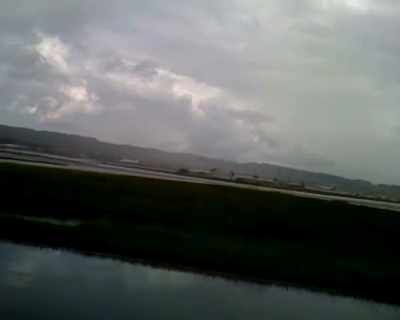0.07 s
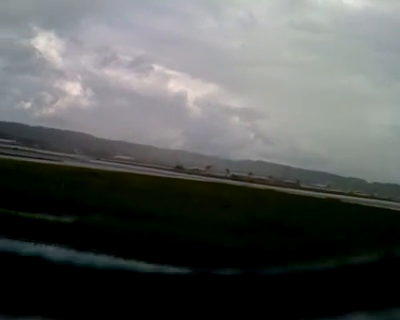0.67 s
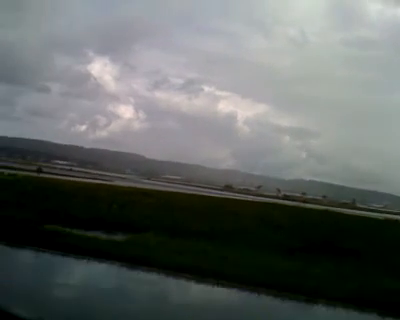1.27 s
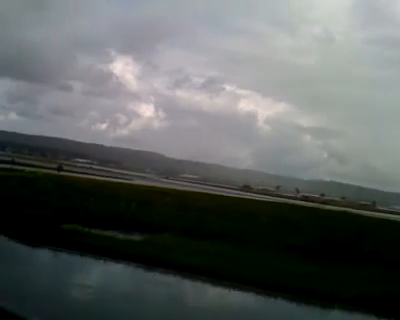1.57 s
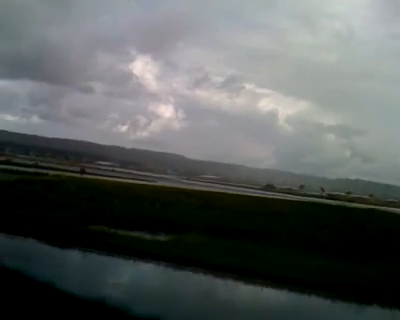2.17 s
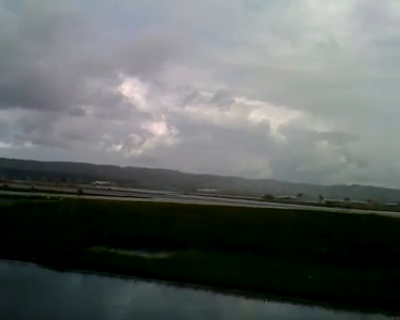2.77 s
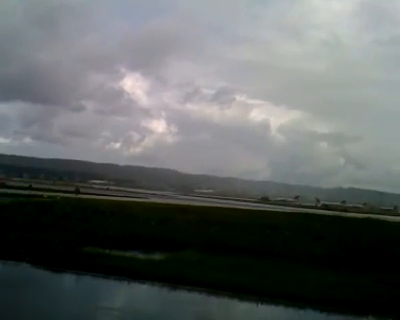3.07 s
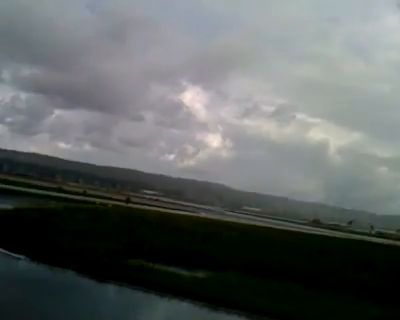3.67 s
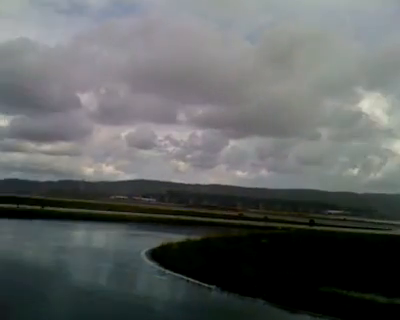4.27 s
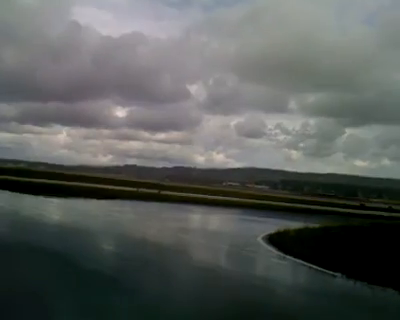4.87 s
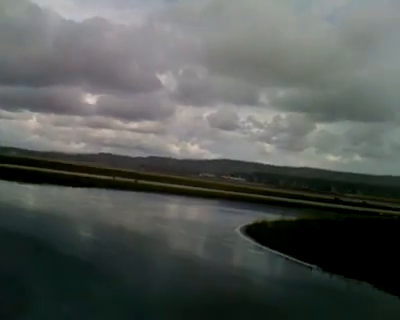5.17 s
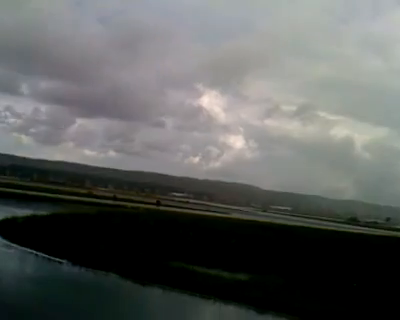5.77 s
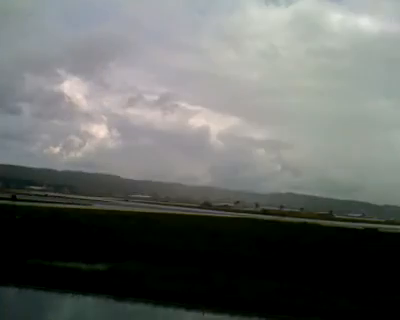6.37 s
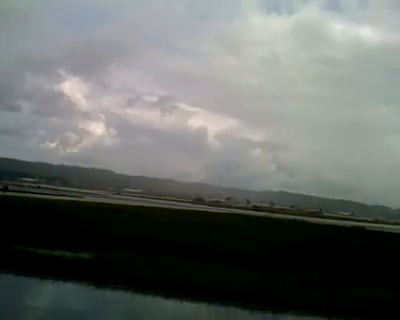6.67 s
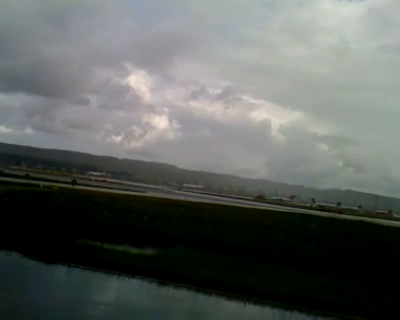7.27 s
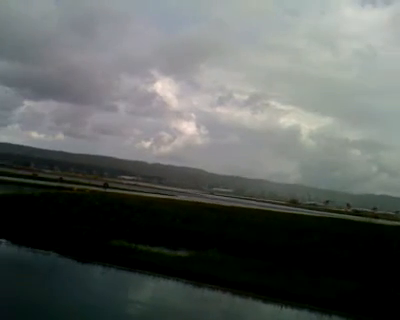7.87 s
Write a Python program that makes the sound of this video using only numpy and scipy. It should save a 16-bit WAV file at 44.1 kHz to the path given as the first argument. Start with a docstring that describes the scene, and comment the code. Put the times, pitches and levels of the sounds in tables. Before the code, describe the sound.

Jet engines run far off at an airfield, giving a steady low rumble and a hollow roar. A faint whine wavers and creeps upward in pitch, and a little past halfway a soft howl holds for about a second. Wind buffets the microphone now and then with low thumps. Close by, light irregular ticks like sparse raindrops continue throughout, over a fine crackle and soft hiss.

```python
"""An airfield, with jet engines running far off. Turbulent exhaust gives a steady rumble and a roar, made
hollow where the ground reflection cancels one band; faint blade tones creep up as a shaft gains speed.
Wind eddies buffet the microphone now and then. Close by, small impacts (perhaps sparse raindrops) give
light ticks, among a fine crackle and a few scuffs, over a soft hiss."""
import sys
import numpy as np
from scipy import signal
from scipy.fft import rfft, irfft
from scipy.io import wavfile
from scipy.ndimage import uniform_filter1d

SR = 44100
rng = np.random.default_rng(int(sys.argv[2]) if len(sys.argv) > 2 else 0)


def pcm_store(signal):
    """Save signal as 16-bit PCM."""
    levels = np.round(np.clip(np.atleast_2d(signal), -1, 1) * 32767)
    wavfile.write(sys.argv[1], SR, levels.astype(np.int16).T)


N = 351918
TIME = np.arange(N) / SR

# Spectral densities of exhaust bands, wind and hiss: (frequency [Hz], relative level [dB])
BOOM_SPECTRUM = [(70, -9), (130, -18), (160, -3), (190, 1.5), (212, 2), (240, -33), (330, -48), (600, -94)]
RUMBLE_SPECTRUM = [(60, -39), (105, -15.5), (135, 3), (165, -2), (200, -2.5), (235, -2.5), (270, 0.5),
                   (310, -3.5), (360, -8.5), (410, -6.5), (500, -13), (650, -32), (1200, -70)]
DRONE_SPECTRUM = [(280, -36), (350, 3), (395, -4.5), (480, -26), (700, -70)]
ROAR_SPECTRUM = [(350, -27), (500, -8), (590, 0.5), (660, -2), (730, 0), (800, -3), (880, -6), (970, -18),
                 (1150, -22), (2000, -84)]
RUSH_SPECTRUM = [(600, -5), (950, 0), (1150, 2.5), (1400, 2.5), (1560, -0.5), (1730, 1), (2000, -4.5),
                 (2400, -10), (3000, -16.5), (5000, -35.5), (11000, -67)]
WIND_SPECTRUM = [(8, -23), (20, -11.5), (32, 0), (42, 1.5), (56, 5.5), (72, -2), (95, -3.5), (130, -8),
                 (200, -14), (500, -84)]
HISS_SPECTRUM = [(1200, -20), (2600, -10), (3200, 4.5), (4000, 5.5), (5100, 3), (6800, -0.5), (8000, 0.5),
                 (9000, 0), (11000, -6)]
# Slow envelopes of exhaust bands and crackle: (time [s], level [dB])
BOOM_ENVELOPE = [(0, -39.5), (.7, -36.5), (1.4, -47), (2.1, -36.5), (2.9, -45), (4.2, -36), (4.8, -39.5),
                 (6.1, -39.5), (6.7, -36.5), (8, -36.5)]
DRONE_ENVELOPE = [(0, -66), (4.5, -45.5), (6, -46.5), (8, -43)]
ROAR_ENVELOPE = [(0, -41.5), (1.2, -39.5), (4.5, -41), (5.7, -40.5), (6.9, -43), (8, -41)]
RUSH_ENVELOPE = [(0, -48), (3.8, -50), (6.7, -47), (8, -45.5)]
CRACKLE_ENVELOPE = [(0, -63), (.65, -63), (1.2, -63.5), (2.5, -65), (4, -67.5), (5.2, -66), (8, -65.5)]
# Band cancelled by the ground reflection: (time [s], centre [Hz])
GROUND_NOTCH = [(0, 420), (1.3, 433), (3.2, 517), (4.3, 456), (5.6, 420), (7.1, 550), (8, 520)]
# Shaft tones swelling in transit through the air: (peak time [s], length [s], harmonic [-], level [dB])
HARMONIC_SWELLS = [(1.05, 0.28, 26, -61), (2, 0.32, 26, -59.5), (2.945, 0.76, 26, -56.5),
                   (4.4, 0.89, 26, -60.5), (6.35, 1.3, 26, -57), (8.15, 0.31, 26, -48),
                   (4.0, 0.55, 9, -46.5), (5.5, 0.34, 9, -53), (7.2, 1, 9, -70), (2.64, 1.46, 10, -44.5),
                   (4.3, 0.38, 10, -44), (5.356, 0.95, 10, -45.5), (7.63, 0.52, 10, -45),
                   (2.806, 1.9, 12, -52), (5.4, 0.62, 12, -52.5), (7.8, 0.76, 12, -48.5)]
# A howl that sets in, holds and lifts as it ends: (time [s], pitch [Hz], level [dB])
HOWL_CONTOUR = [(3.85, 622, -75), (4.15, 629, -45), (4.45, 633, -42), (4.7, 635, -40), (5.0, 636, -42),
                (5.24, 642, -42), (5.38, 645, -60), (5.6, 645, -90)]
# Gliding turbine tones: (peak time [s], length [s], pitch [Hz], glide [octaves/s], base level [dB])
SPOOL_GLIDE = (3.6, 4.5, 1424, .087, -62.5)
WHISTLE_GLIDE = (4.05, .6, 4050, -.02, -78)
SIZZLE_GLIDE = (5, 1.3, 3750, -.14, -70.5)
# Patches where the spooling engine comes through: (peak time [s], length [s], gain [dB])
SPOOL_PATCHES = [(2.2, 0.25, 8), (4.1, .4, 6), (4.7, .2, 4), (6.4, .3, 10)]
# Gusts above the steady breeze: (peak time [s], length [s], level [dB])
WIND_GUSTS = [(.28, 0.18, -28.5), (.62, 0.17, -29), (.95, 0.11, -25), (1.5, 0.99, -36.5), (3.1, 0.19, -30),
              (3.85, 0.37, -31.5), (4.36, 0.12, -35.5), (5.4, 0.44, -34.5), (6.469, 0.15, -29.5),
              (6.7, 0.41, -31.5), (6.94, .14, -32.5)]
# Single eddies striking the microphone: (time [s], peak level [dB], frequency [Hz])
WIND_EDDIES = [(0.586, -10.5, 78.5), (0.623, -22, 61.4), (0.642, -18, 98), (0.912, -17, 47.6),
               (0.935, -22, 64.6), (1.931, -20, 65), (3.104, -20, 57), (3.876, -18, 64.5), (4.401, -19, 64),
               (6.318, -18.5, 73.6), (6.45, -33, 60.1), (6.702, -15.5, 89), (6.84, -26, 94),
               (6.904, -20, 110), (6.945, -19, 53.7), (6.999, -33, 45)]
# Near impacts: (time [s], snap energy [dB], brightness [Hz], breadth [octaves], ping pitch [Hz],
# ping energy [dB])
IMPACTS = [(0.1806, -21, 2270.0, 1.8, 7400.0, -40), (0.2453, -22, 1930.0, 1.3, 4000.0, -27),
           (0.306, -23, 2860.0, 0.8, 5400.0, -30), (0.3477, -19, 5600, 1.3, 7100, -21.5),
           (0.7197, -31.0, 2350.0, 1.8, 4000.0, -32), (0.94, -46, 7460.0, 0.5, 5800.0, -34),
           (1.3006, -25, 2150.0, 0.58, 6500.0, -31), (1.505, -33, 1690.0, 0.7, 6270, -30.5),
           (1.6888, -20, 2900, 2.7, 8400, -35), (1.8, -22, 2800, 1.8, 4770, -29),
           (1.8862, -31, 4500, 1, 5000, -38), (2.0253, -27, 2990.0, 1.7, 7340, -33),
           (2.1167, -25, 2410.0, 0.46, 6300.0, -30), (2.1496, -40, 5160.0, 0.5, 3700.0, -31),
           (2.183, -24.5, 2570.0, 0.81, 7800.0, -34), (2.529, -23, 1500, 1.6, 7500, -36),
           (2.7219, -21.5, 1400, 1, 8500, -35), (3.036, -20.5, 9000, 0.47, 7260, -21),
           (3.6378, -23, 1380, 0.77, 4970, -37), (4.136, -22, 1400, 1.9, 5200.0, -45),
           (4.4591, -24, 2000, 0.9, 3000, -41), (4.607, -35, 3600, 1.2, 4200, -45),
           (4.6917, -36, 9000.0, 0.3, 5100.0, -36), (4.948, -27, 5870.0, 1.1, 4200.0, -38),
           (4.972, -19, 4700, 0.65, 8100, -34), (5.0866, -22, 1760.0, 1.5, 6800.0, -31),
           (5.112, -27, 3770.0, 0.87, 8000.0, -34), (5.1608, -26.0, 3570.0, 1.4, 6950, -32),
           (5.2816, -22, 2070, 0.92, 4600.0, -38.5), (5.289, -27, 3100, 1.1, 4400, -37),
           (5.378, -27, 2850.0, 1.8, 6000.0, -26.5), (5.4762, -21.5, 1430.0, 1.8, 9700.0, -37),
           (5.5104, -20, 3300, 0.51, 6640, -35), (5.6484, -18, 4570.0, 2.2, 6450, -26),
           (5.722, -33, 8390.0, 0.3, 3700.0, -29.5), (5.8836, -24.5, 6740.0, 2.1, 7900.0, -40.0),
           (5.897, -33, 5070, 1.8, 3000.0, -31), (6.0036, -23, 1432, 1.8, 6320, -37),
           (6.161, -24, 2800, 1, 3300, -27), (6.1785, -14.5, 1480.0, 1.7, 5300.0, -40),
           (6.3308, -17, 1860.0, 0.63, 8000.0, -41), (6.413, -22.5, 1490.0, 1.2, 4230, -37),
           (6.4955, -32, 4800, 1, 6000, -38), (6.735, -23, 1440.0, 1.7, 3000.0, -27),
           (6.8345, -34, 6000, 1.43, 9100, -39), (7.232, -33, 3410, 1.2, 6500, -38),
           (7.2532, -34, 5600.0, 0.27, 9700.0, -42.0), (7.3127, -20.5, 2420.0, 1.2, 5000.0, -36),
           (7.4079, -19, 2660.0, 1.4, 7800, -29), (7.4424, -21.5, 1660.0, 1.6, 4400.0, -36.0),
           (7.7405, -12.5, 2330, 1.5, 6250, -22.5), (7.7854, -22, 2960.0, 0.87, 7900.0, -34.5),
           (7.9558, -21, 2430.0, 1.7, 5900.0, -30)]
# Colour common to all snaps: (frequency [Hz], relative level [dB])
SNAP_SPECTRUM = [(400, -24), (1000, 13.5), (1800, 10.5), (2800, 1.5), (4200, 0.5), (5200, -3.5), (6400, -4),
                 (7600, -6), (8900, -8.5), (9900, -8), (11000, -8.5)]
# Dull knocks of the heavier impacts: (time [s], energy [dB], pitch [Hz])
IMPACT_KNOCKS = [(1.799, -22, 1240), (4.4591, -26, 1800), (5.6477, -24, 1550), (6.1785, -15, 1380),
                 (6.3313, -23, 1550), (7.4077, -17, 1150), (7.739, -14, 1190)]
# Brief rubs: (time [s], length [s], level [dB], brightness [Hz])
RUBS = [(0.674, 0.034, -53, 3200), (2.542, 0.013, -54, 2800), (2.952, .012, -54, 4500),
        (3.364, .008, -53, 5000), (3.39, 0.016, -61, 4500), (3.46, 0.013, -57, 4500),
        (6.055, 0.011, -44, 1300), (6.835, 0.0082, -43, 2000), (7.185, .013, -42, 1197)]

RUMBLE_DB, WHINE_DB, BREEZE_DB, HISS_DB = -34, -71, -36, -66.5
NOTCH_WIDTH_HZ, NOTCH_NARROWING_PER_S = 82, 0.053
SHAFT_HZ, SHAFT_RISE_HZ_PER_S, BLADE_COUNT = 64.25, .62, 26
PING_DECAY_S, KNOCK_DECAY_S = 0.00016, 0.00045
REBOUND_RANGE_S, REBOUND_DB = (.0005, .0014), -3.5
GROUND_ECHO_S, GROUND_ECHO_DB = 0.0061, -14.5
CRACKLE_PER_S, CRACKLE_CLUMPING, CRACKLE_SPREAD_DB = 520, .6, 5.2


def exhaust():
    """Turbulent mixing radiates broadband noise; absorption over distance has taken most of its treble."""
    boom = envelope(BOOM_ENVELOPE) * noise(BOOM_SPECTRUM, patchy_db=2.5, size=4096)
    # The rumble brightens as thrust builds.
    rumble = amp(RUMBLE_DB) * noise(RUMBLE_SPECTRUM, patchy_db=1, notch_db=5.5, octaves_per_s=0.0093)
    roar = envelope(ROAR_ENVELOPE) * noise(ROAR_SPECTRUM, patchy_db=1.5, notch_db=13)
    rush = envelope(RUSH_ENVELOPE) * noise(RUSH_SPECTRUM, patchy_db=1.5)
    drone = envelope(DRONE_ENVELOPE) * noise(DRONE_SPECTRUM, patchy_db=0)
    return boom + rumble + drone + roar + rush


def noise(spectrum, patchy_db, notch_db=0, octaves_per_s=0, size=2048):
    """Coloured noise fades in patches in moving air; ground interference can cut a notch in it."""
    hop = size // 4
    t, hz = np.arange(N // hop + 5) * hop / SR, np.fft.rfftfreq(size, 1 / SR)
    real, imag, patches = rng.standard_normal((3, len(t), len(hz)))
    patches = uniform_filter1d(patches, size=14, axis=0)
    patches = unit(uniform_filter1d(patches, size=9, axis=1))
    notch_hz = np.interp(t, *np.transpose(GROUND_NOTCH))[:, None]
    width_hz = NOTCH_WIDTH_HZ * np.exp(-NOTCH_NARROWING_PER_S * t)[:, None]
    notch = np.exp(-((hz - notch_hz) / width_hz) ** 2)
    creep = 2 ** (octaves_per_s * (t - t.mean()))[:, None]
    db = colour(spectrum, hz / creep) + patchy_db * patches - notch_db * notch
    frames = (real + 1j * imag) * amp(db)
    return unit(signal.istft(frames.T, nperseg=size, noverlap=size - hop)[1][:N])


def fan():
    """Rotation radiates harmonics of the shaft rate, up to the blade-passing whine; all rise together."""
    shaft_hz = SHAFT_HZ + SHAFT_RISE_HZ_PER_S * TIME
    gains = {BLADE_COUNT: amp(WHINE_DB)}
    for peak_s, length_s, harmonic, db in HARMONIC_SWELLS:
        gains[harmonic] = np.hypot(gains.get(harmonic, 0), amp(db) * swell(peak_s, length_s))
    whine = gains.pop(BLADE_COUNT) * blade_tone(BLADE_COUNT * shaft_hz, waver_hz=.7, flutter=.2)
    lower = sum(gain * blade_tone(k * shaft_hz, waver_hz=2.5, flutter=.7) for k, gain in gains.items())
    return whine + lower


def turbines():
    """Blade passage in other engines gives a howl, a rising tone, a thin whistle and a falling sizzle."""
    times, howl_hz, howl_db = np.transpose(HOWL_CONTOUR)
    hz, gain = np.interp(TIME, times, howl_hz), amp(np.interp(TIME, times, howl_db))
    howl = gain * blade_tone(hz, waver_hz=1.6, flutter=0.3)
    hz, gain = glide(*SPOOL_GLIDE)
    boost = 1 + sum((amp(db) - 1) * swell(s, length_s) for s, length_s, db in SPOOL_PATCHES)
    spool = gain * boost * blade_tone(hz, waver_hz=8.1, flutter=1)
    hz, gain = glide(*WHISTLE_GLIDE)
    whistle = gain * blade_tone(hz, waver_hz=35.3, flutter=1.2)
    hz, gain = glide(*SIZZLE_GLIDE)
    carrier = np.sin(2 * np.pi * np.cumsum(hz) / SR)
    sizzle = gain * unit(drift(rate_hz=410) * carrier)  # turbulence smears the tone into a band
    return howl + spool + whistle + sizzle


def blade_tone(hz, waver_hz, flutter):
    """Scattering in the air modulates a tone: its pitch wavers and its strength flutters."""
    phase = 2 * np.pi * np.cumsum(hz + waver_hz * drift(rate_hz=13.34)) / SR
    scattered = drift(rate_hz=23) * np.cos(phase) + drift(rate_hz=39) * np.sin(phase)
    return unit(np.sin(phase) + flutter * scattered)


def wind():
    """Turbulent pressure on the microphone swells with each gust; a strong eddy gives one push and pull."""
    gust_power = sum((amp(db) * swell(s, length_s)) ** 2 for s, length_s, db in WIND_GUSTS)
    strength = np.sqrt(amp(BREEZE_DB) ** 2 + gust_power)
    flow = noise(WIND_SPECTRUM, patchy_db=0, size=4096)
    flow /= np.sqrt(uniform_filter1d(flow ** 2, size=14000))  # the gusts alone set the slow swell
    pressure = strength * flow
    for s, db, hz in WIND_EDDIES:
        u = np.arange(-SR // 20, SR // 20) / SR * np.pi * hz
        add(pressure, s - 1 / 20, amp(db) * (2 * u ** 2 - 1) * np.exp(-u ** 2))
    return pressure


def ticks():
    """Each impact excites a snap and a ping, then rebounds; heavier ones knock. The ground reflects all."""
    near = np.zeros(N)
    shares = unit(amp([0, REBOUND_DB])) / np.sqrt(2)  # the two contacts share the energy
    for s, db, bright_hz, octaves, ping_hz, ping_db in IMPACTS:
        gap_s = rng.uniform(*REBOUND_RANGE_S)
        for contact_s, share in zip((s - gap_s / 2, s + gap_s / 2), shares):
            click = snap(bright_hz, octaves)
            add(near, contact_s - len(click) / 2 / SR, share * amp(db) * click)
            add(near, contact_s, share * amp(ping_db) * ping(ping_hz, PING_DECAY_S))
    for s, db, hz in IMPACT_KNOCKS:
        add(near, s - KNOCK_DECAY_S, amp(db) * ping(hz, KNOCK_DECAY_S))
    add(near, GROUND_ECHO_S, amp(GROUND_ECHO_DB) * near)
    return near


def snap(bright_hz, octaves, attack_decay_s=0.0004, tail_decay_s=0.005, tail_gain=0.0397, size=1024):
    """A brief contact has a broad spectrum: a damped burst of unit energy, starting at mid-array."""
    t, hz = np.arange(size) / SR, np.fft.rfftfreq(size, 1 / SR)
    attack = rfft(rng.standard_normal(size) * np.exp(-t / attack_decay_s))
    tail = rfft(rng.standard_normal(size) * np.exp(-t / tail_decay_s))
    burst = attack / abs(attack) ** .35 + tail_gain * tail  # the attack is partly whitened
    detuning = np.log2((hz + 1) / bright_hz) / octaves
    log_gain = np.log(amp(colour(SNAP_SPECTRUM, hz))) - 2 * np.log1p((detuning / 2) ** 2)
    mirrored = np.r_[log_gain, log_gain[-2:0:-1]]
    minimum_phase = np.exp(np.conj(signal.hilbert(mirrored)))[:len(hz)]
    sound = np.roll(irfft(burst * minimum_phase), size // 2)
    return sound / np.linalg.norm(sound)


def ping(hz, decay_s, size=512):
    """Damped resonance: the struck spot rings for a few cycles at its natural frequency."""
    t = np.arange(size) / SR
    sound = t * np.exp(-t / decay_s) * np.sin(2 * np.pi * (hz * t + rng.random()))
    return sound / np.linalg.norm(sound)


def crackle(colours=24, bright_range_hz=(4000, 10000)):
    """Shot noise: tiny snaps, many weak and a few stronger, land at random in loose clumps."""
    rate_per_s = CRACKLE_PER_S * np.exp(CRACKLE_CLUMPING * drift(rate_hz=14))
    arrivals = rng.random(N) < rate_per_s / SR
    hits = arrivals * amp(CRACKLE_SPREAD_DB * np.minimum(rng.exponential(1, N), 3.4))
    kind = rng.integers(0, colours, N)
    snaps = [snap(hz, octaves=0.69) for hz in np.geomspace(*bright_range_hz, colours)]
    patter = sum(signal.oaconvolve(hits * (kind == k), snaps[k], "same") for k in range(colours))
    return envelope(CRACKLE_ENVELOPE) * unit(patter)


def scuffs(snaps_per_s=1500):
    """Friction, perhaps of fingers on the camera: each gritty rub is a tight cluster of snaps."""
    grit = np.zeros(N)
    for s, length_s, db, bright_hz in RUBS:
        gain = amp(db) * np.sqrt(SR / snaps_per_s)
        for offset in rng.triangular(-1, 0, 1, int(snaps_per_s * length_s) + 1):
            click = snap(bright_hz, octaves=1.43)
            add(grit, s + offset * length_s - len(click) / 2 / SR, gain * click)
    return grit


def hiss():
    """Stationary noise forms a soft, even floor in the treble."""
    return amp(HISS_DB) * noise(HISS_SPECTRUM, patchy_db=1.2, size=512)


def amp(db):
    """Amplitude grows tenfold for every 20 dB."""
    return 10 ** (np.asarray(db) / 20)


def unit(x):
    """Normalisation to rms 1."""
    return x / np.sqrt(np.mean(x ** 2) + 1e-20)


def colour(spectrum, hz):
    """Spectral level in dB, interpolated on a log-frequency axis."""
    frequencies, db = np.transpose(spectrum)
    return np.interp(np.log(hz + 1), np.log(frequencies), db)


def envelope(rows):
    """Amplitude at every sample, interpolated in decibels."""
    return amp(np.interp(TIME, *np.transpose(rows)))


def swell(peak_s, length_s):
    """A Gaussian envelope whose length is its full width at half power."""
    return 2 ** (-2 * ((TIME - peak_s) / length_s) ** 2)


def glide(peak_s, length_s, hz, octaves_per_s, db):
    """Frequency and amplitude of an exponential sweep that swells and fades."""
    return hz * 2 ** (octaves_per_s * (TIME - peak_s)), amp(db) * swell(peak_s, length_s)


def drift(rate_hz):
    """Low-pass noise: a random fluctuation of rms 1."""
    hz = np.fft.rfftfreq(N, 1 / SR)
    return unit(irfft(rfft(rng.standard_normal(N)) * np.exp(-(hz / rate_hz) ** 2), N))


def add(mix, start_s, sound):
    """Superposes a delayed sound on the mix."""
    part = mix[max(round(start_s * SR), 0):][:len(sound)]
    part += sound[:len(part)]


def scene():
    """Superposition: the pressures of all sources add in one channel."""
    floor = hiss()
    return (exhaust() + fan() + turbines() + wind() + ticks() + crackle() + scuffs() + floor)[None]


def record(dry, cutoff_hz=11120):
    """Band limiting: the small camera acts as a low-pass filter; both ends are tapered."""
    lowpass = signal.firwin(1601, cutoff_hz, window=("kaiser", 9), fs=SR)
    taper = signal.windows.tukey(N, .001)
    return signal.oaconvolve(dry, lowpass[None], "same") * taper


dry = scene()
out = record(dry)
pcm_store(out)
```